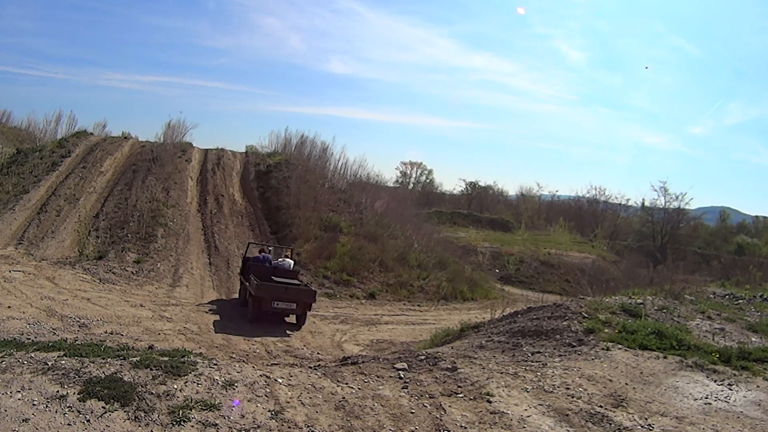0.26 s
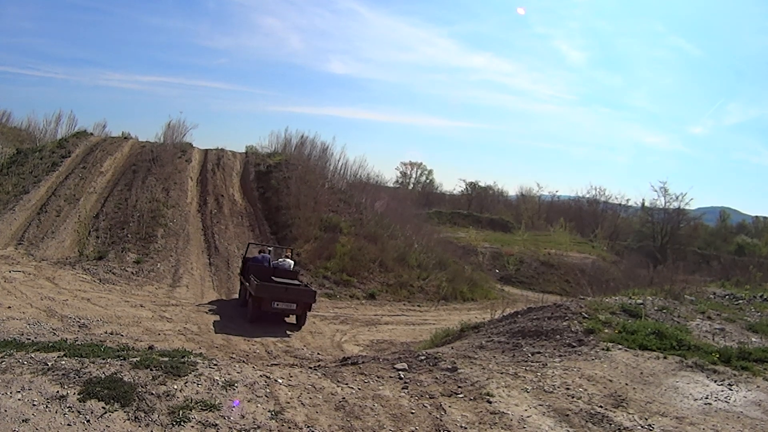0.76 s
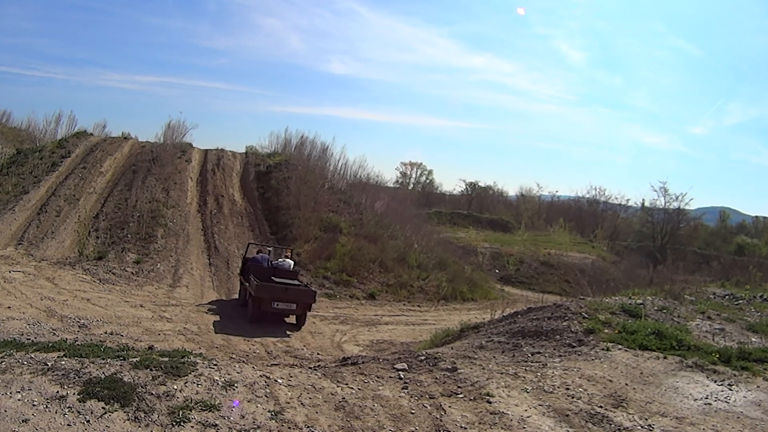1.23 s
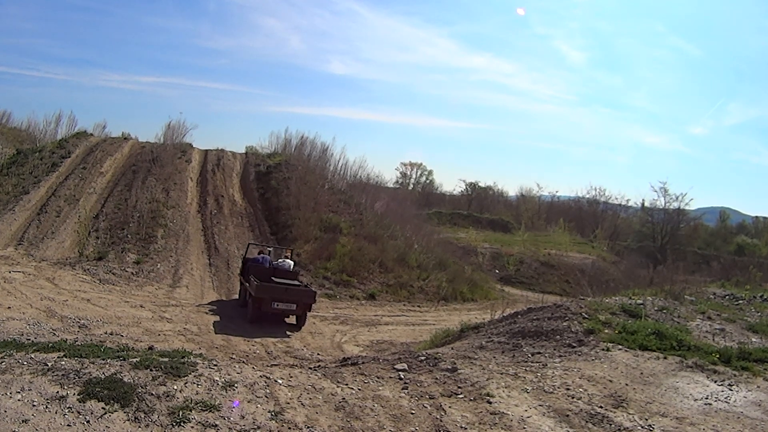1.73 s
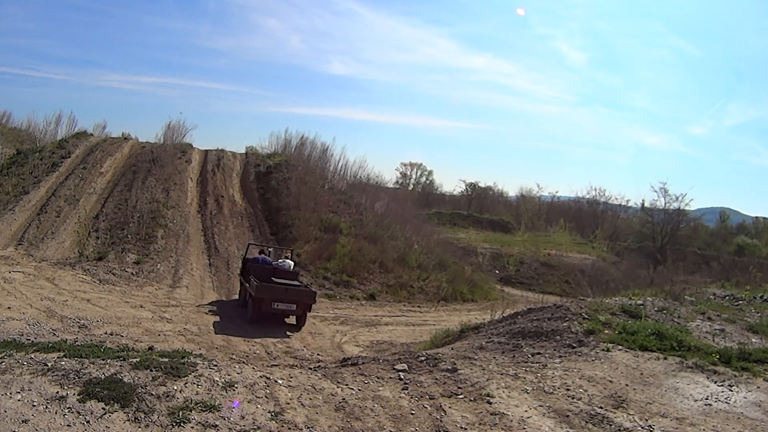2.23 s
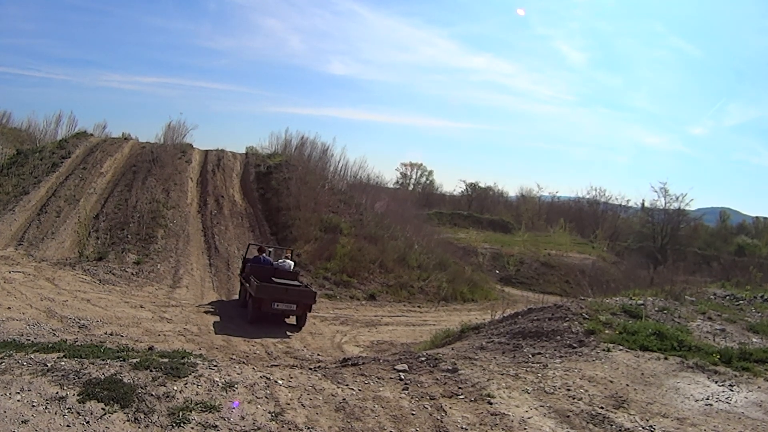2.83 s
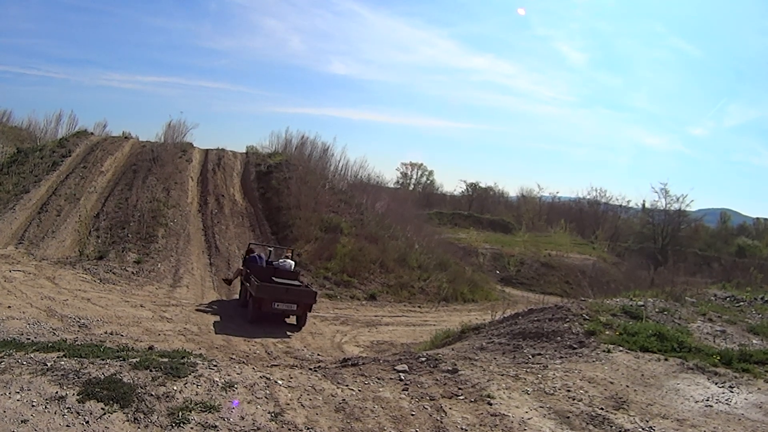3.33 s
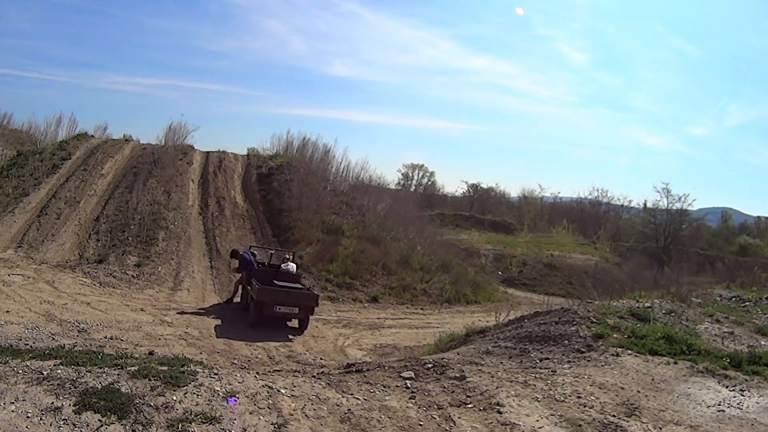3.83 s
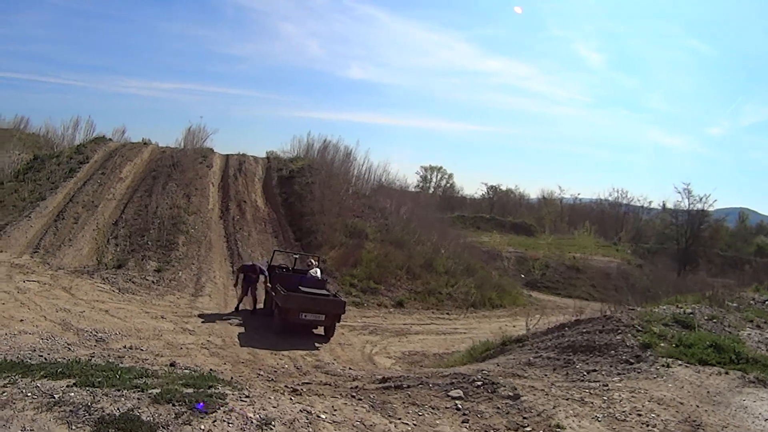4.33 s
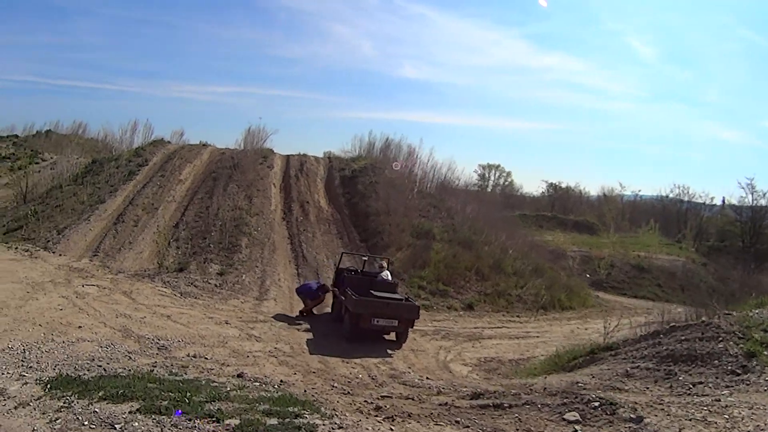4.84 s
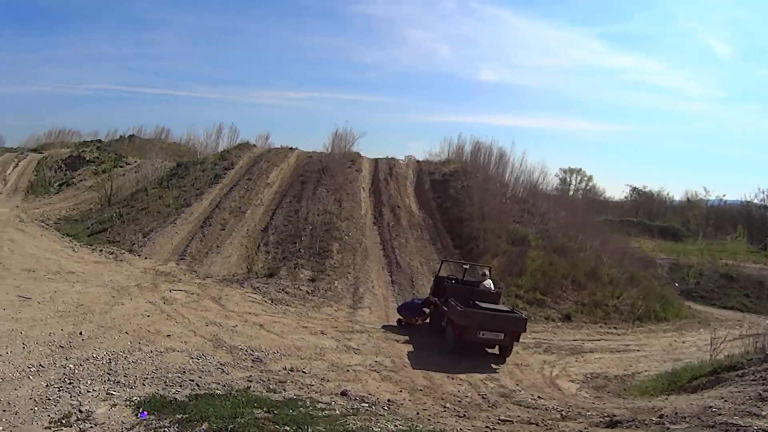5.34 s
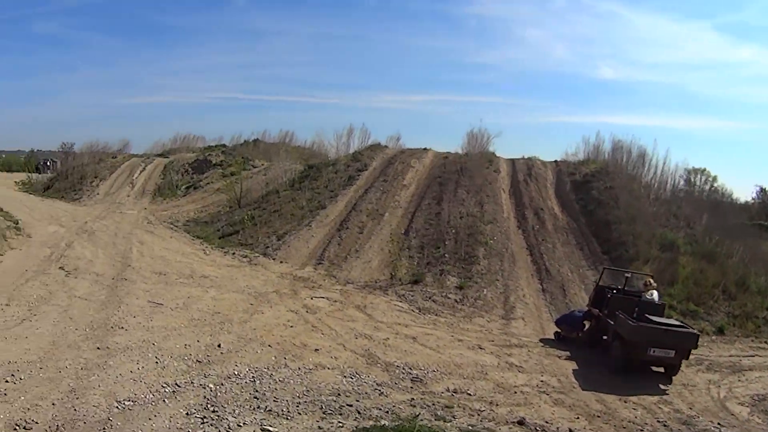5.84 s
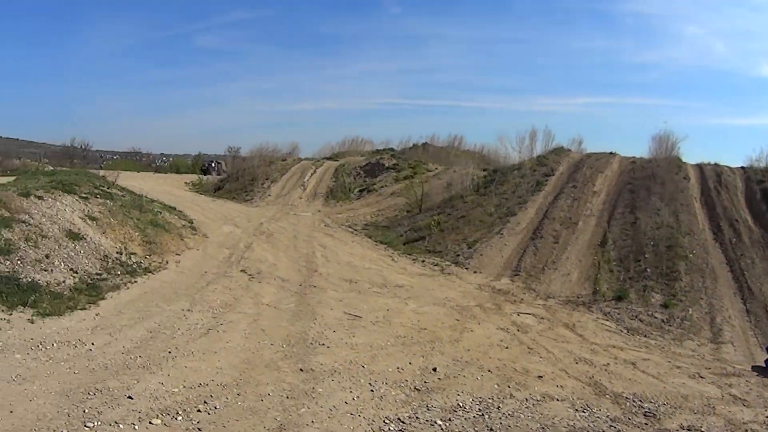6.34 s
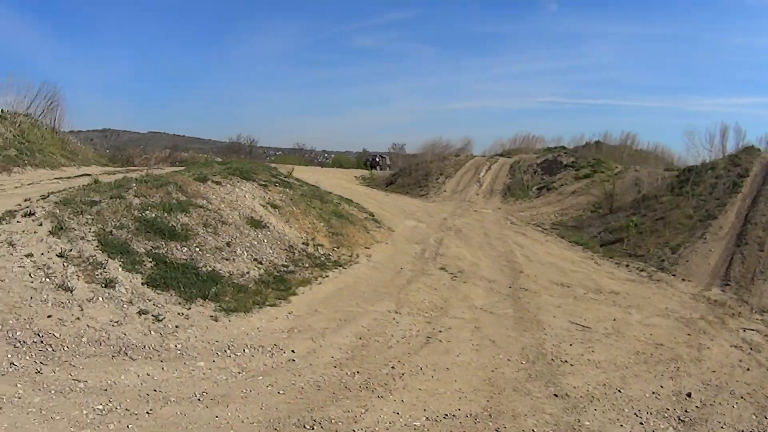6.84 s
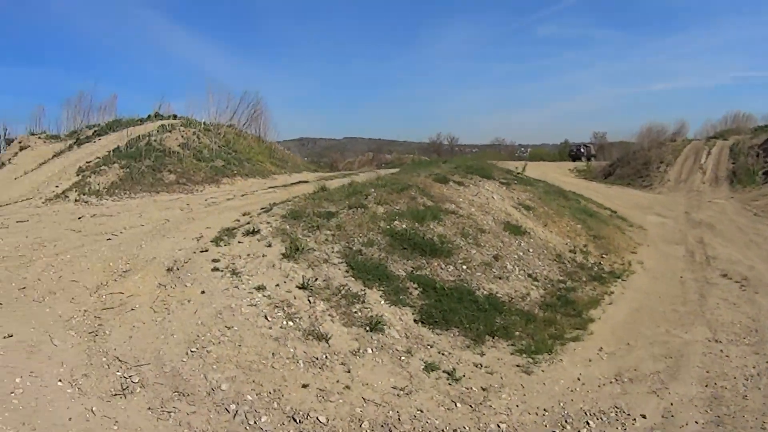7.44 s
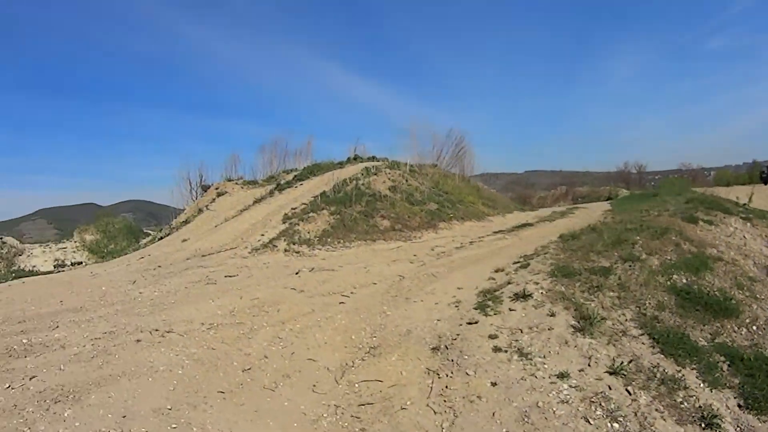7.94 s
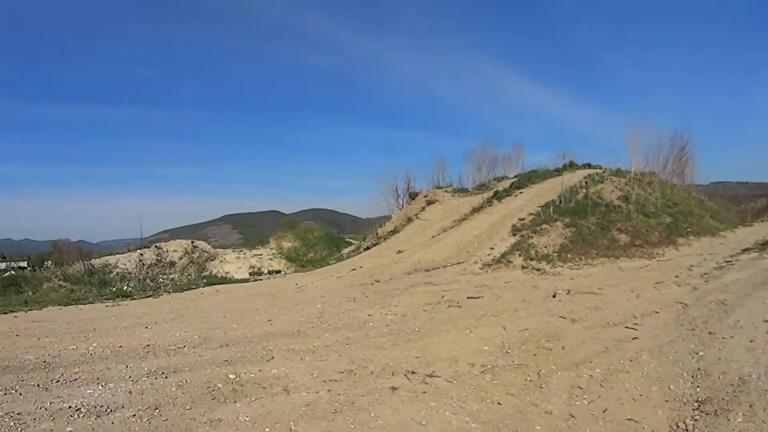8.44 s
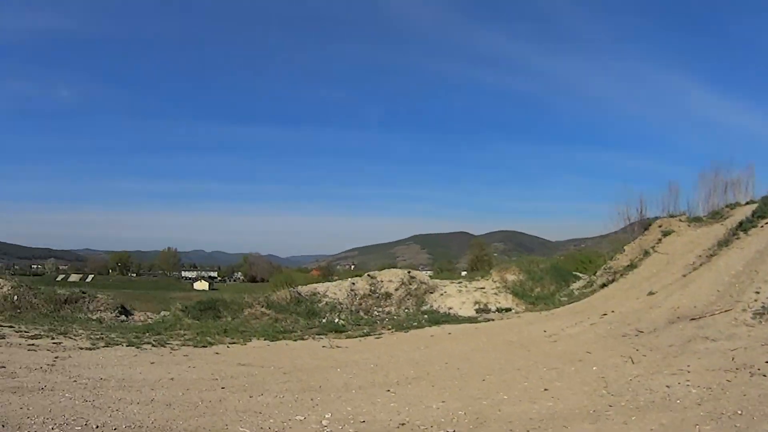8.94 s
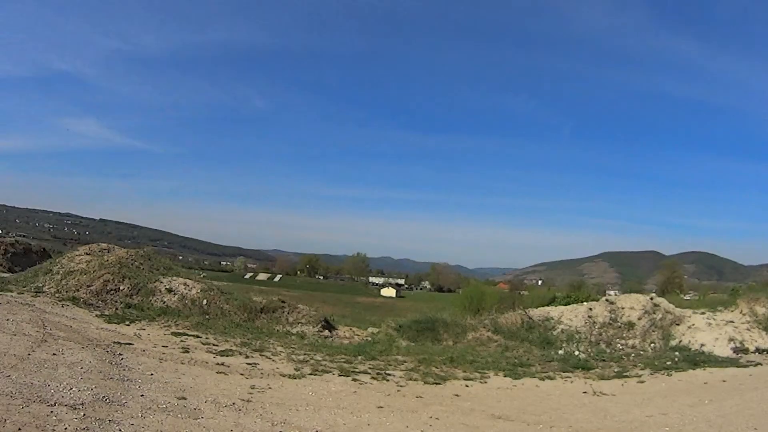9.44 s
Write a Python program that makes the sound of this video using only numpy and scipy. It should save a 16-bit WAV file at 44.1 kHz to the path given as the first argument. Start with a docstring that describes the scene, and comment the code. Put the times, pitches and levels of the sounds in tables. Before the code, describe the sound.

A small air-cooled engine idles, revs, then drives over bumpy dirt, heard on board with knocking bodywork and plastic clattering.

```python
"""A small air-cooled twin idles, is blipped, then drives a small off-road vehicle over rough dirt.
Heard from on board, its firings boom in the body and shake loose panels, while the chassis rumbles
and the bodywork knocks over bumps. The microphone's plastic housing rings, chatters and clacks in its
mount. Cooling air and tyres hiss on top, and gusts buffet the housing once under way."""
import sys
import numpy as np
from scipy import signal
from scipy.fft import rfft, irfft
from scipy.io import wavfile
from scipy.ndimage import uniform_filter1d

SR = 44100
rng = np.random.default_rng(int(sys.argv[2]) if len(sys.argv) > 2 else 0)


def persist_wave(psi):
    """Save psi, clipped to +-1, as 16-bit WAV."""
    counts = np.round(np.clip(psi, -1, 1) * 32767).astype(np.int16)
    wavfile.write(sys.argv[1], SR, np.atleast_2d(counts).T)


N = 426888
TIME = np.arange(N) / SR


def undb(db):
    """Decibels to gain."""
    return 10 ** (np.asarray(db) / 20)


def unit(x):
    """Scale to rms 1."""
    return x / np.sqrt(np.mean(x ** 2))


def peak(x, db):
    """Scale a short sound to a peak level."""
    return x * undb(db) / np.abs(x).max()


def curve(table):
    """Join rows of (seconds, value) by straight lines."""
    return np.interp(TIME, *np.transpose(table))


def noise():
    """White noise."""
    return rng.standard_normal(N)


def walk(rate):
    """Random levels held 1 / rate s and slewed; spread near 1."""
    size = int(SR / rate)
    steps = np.repeat(rng.standard_normal(N // size + 1), size)[:N]
    return 1.2 * uniform_filter1d(steps, size)


def waver(x, share, rate):
    """Let a sound's pitch wander by a small share, turning about rate times a second."""
    at = np.arange(N)
    return np.interp(at + share * SR / rate * walk(rate), at, x)


def colour(x, points):
    """Shape x by a spectrum of (Hz, dB) points."""
    hz, db = np.transpose(points)
    gain_db = np.interp(np.log(np.fft.rfftfreq(N, 1 / SR) + 1), np.log(hz), db)
    return irfft(rfft(x) * undb(gain_db), N)


def lowpass(x, hz, order):
    """Roll off the treble above hz."""
    return signal.sosfilt(signal.butter(order, hz, fs=SR, output="sos"), x)


def band(x, hz, width_hz):
    """A resonance applied twice, for steep skirts."""
    b, a = signal.iirpeak(hz, hz / width_hz, fs=SR)
    return signal.lfilter(b, a, signal.lfilter(b, a, x))


def ring(x, modes):
    """Drive a set of (Hz, width in Hz, dB) resonances, alternating in polarity."""
    return sum((-1) ** k * undb(db) * band(x, hz, width) for k, (hz, width, db) in enumerate(modes))


def add(track, s, sound):
    """Mix a short sound into the track at time s."""
    start = int(s * SR)
    track[start:start + len(sound)] += sound[:N - start]


def burst(decay_s, rise_s=0.00023):
    """A crowd of tiny contacts that dies away."""
    t = TIME[:SR // 4]
    return rng.standard_normal(len(t)) * (1 - np.exp(-t / rise_s)) * np.exp(-t / decay_s)


def pulses(cycles, scatter_db, weak_db):
    """One pulse a cycle, scattered in level, every second one weaker."""
    at = np.flatnonzero(np.diff(np.floor(cycles)))
    size_db = scatter_db * rng.standard_normal(600)[:len(at)] + weak_db * (np.arange(len(at)) % 2)
    out = np.zeros(N)
    out[at] = undb(size_db)
    return out


# The revs. Each row: time in seconds, crank speed in Hz (one firing a turn).
REVS = [(0, 22.02), (.8, 21.42), (2.2, 21.59), (2.6, 22.58), (3.0, 22.84), (3.11, 27.2), (3.22, 31.65),
        (3.44, 37.5), (3.67, 32.91), (3.95, 24.84), (4.15, 22.9), (4.33, 29.3), (4.55, 30.06),
        (4.76, 32.53), (4.98, 24.81), (5.25, 29.21), (5.52, 32.94), (5.8, 39.86), (6.03, 42.4),
        (6.43, 38.6), (6.75, 33.85), (6.95, 29.5), (7.7, 32.14), (8.08, 24.32), (8.3, 28.5), (8.5, 31.46),
        (8.68, 33.03), (8.9, 32.78), (9.1, 31.12), (9.3, 32.42), (9.68, 38.07)]
def crank():
    """The crank runs slightly unevenly; gives its count of turns and its smooth speed in Hz."""
    hz = curve(REVS)
    return np.cumsum(hz * (1 + .008 * walk(14))) / SR, hz


def by_load(hz, at_idle, at_load):
    """Slide a setting as the crank speeds up from idle to full load."""
    return np.interp(hz, [20.9, 29.1], [at_idle, at_load])


# Idle, a blip, pulling away, easing off, a second pull. Each row: time in seconds, dB over idle.
EFFORT = [(0, -0.5), (.85, -1.5), (1.15, -0.2), (1.7, -1), (2.2, 2.5), (3.01, 1), (3.12, 9.5), (3.27, 10.5),
          (3.4, 5), (3.55, 2), (4.98, 0.5), (5.1, 8), (5.45, 6.5), (5.7, 5.5), (6.9, 2.5), (8.0, 3),
          (8.12, 8.5), (8.55, 10), (8.76, 7.5), (8.92, 10.5), (9.3, 8), (9.68, 6.5)]
# How hard the vehicle shakes on its wheels. Each row: time in seconds, dB over standing still.
RIDE = [(0, 3), (2.98, 0), (3.06, 3.5), (3.3, 2.5), (3.5, -1), (4.95, 2), (5.04, 6), (5.16, 5), (5.9, 6.5),
        (6.6, 6.5), (7.72, 9.5), (7.87, 5), (8.25, 7), (8.95, 2), (9.68, 10)]
def shaking():
    """Drive levels in dB: effort raises boom, panels and housing; rough ground adds to the last two."""
    effort_db, ride_db = curve(EFFORT), curve(RIDE)
    boom_db = -26.5 + effort_db
    panel_db = -42.5 + 0.76 * effort_db + ride_db
    housing_db = -49 + 0.36 * effort_db + 0.31 * ride_db
    return boom_db, panel_db, housing_db


# The boom of the air in the body. Each row: pitch in Hz, width in Hz, gain in dB.
BOOM_MODES = [(46.3, 6.6, -13), (56.7, 13.5, 0), (96.4, 23.2, 1), (124.2, 30.5, 0)]
# The shell's higher, rougher ring. Each row: pitch in Hz, width in Hz, gain in dB.
SHELL_MODES = [(112.4, 36.6, 9.5), (156.8, 41, -2.5), (202.8, 45, 4), (262.7, 45, -3), (308.4, 46.5, -1),
               (385.8, 27.3, -11)]
def engine(turns, hz, boom_db):
    """Two unequal cylinders boom in the body; the shell chugs at idle and shakes roughly under load."""
    firings = unit(pulses(turns, scatter_db=1.5, weak_db=-2.5) / np.sqrt(hz))
    boom = unit(ring(firings + by_load(hz, 0.72, 0.75) * noise(), BOOM_MODES))
    rough = by_load(hz, 1.0, 2.67)
    shell = unit(ring((firings + rough * noise()) / np.hypot(1, rough), SHELL_MODES))
    shell_db = -5.5 + 0.15 * (hz - hz.min())
    return (boom * undb(-3.0) + shell * undb(shell_db)) * undb(boom_db)


# Clean tones under the boom. Each row: multiple of the crank speed, gain in dB.
HUM_PARTIALS = [(2, -2.5), (3, -14.5), (4, -8.5), (6, -7)]
def hum(turns, hz, boom_db, pull_db=3.5, cruise_db=-7.0, pull_hz_per_s=9.2):
    """Crank harmonics hum through the body: clear while the revs climb, faint at a cruise."""
    tones = sum(undb(db + 2.0 * walk(7.5)) * np.sin(2 * np.pi * multiple * turns)
                for multiple, db in HUM_PARTIALS)
    pull = uniform_filter1d(np.clip(np.gradient(hz) * SR / pull_hz_per_s, 0, 1), SR // 8)
    return ring(tones, BOOM_MODES) * undb(boom_db + 1.0 + pull_db * pull + by_load(hz, 0, cruise_db))


# The ring of the loose panels. Each row: pitch in Hz, width in Hz, gain in dB.
PANEL_MODES = [(372.3, 32, 0.5), (477.3, 99, 3), (555.5, 25.7, 5), (643.7, 104, 4.5), (851, 92, -2.5),
               (947, 87, -5.5)]
# The ring of the plastic housing. Each row: pitch in Hz, width in Hz, gain in dB.
HOUSING_MODES = [(1335, 540, -6), (1593, 125, 8), (1748, 297, 0.5), (2050, 2000, -20.5), (2970, 940, -14.5)]
def clatter(turns, hz, panel_db, housing_db, fade_turns=0.91, grain_db=-0.5):
    """Loose metal rings panels and housing: an even chatter at idle, a shake per firing under load."""
    load = np.clip((hz - 21) / 10, .15, 1)
    kick = np.exp(-(turns % 1) / fade_turns)
    shake = (1 - .55 * load + 1.5 * load * kick) * undb(1.3 * walk(30))
    on_panels, on_housing = (noise() * undb(grain_db * load * walk(400)) * shake for _ in range(2))
    panels = unit(waver(ring(on_panels, PANEL_MODES), share=0.02478, rate=5.0))
    housing = unit(ring(on_housing, HOUSING_MODES))
    return panels * undb(panel_db + 0.5) + housing * undb(housing_db + 3.0)


def scuffs(panel_db, per_s=24, scatter_db=2.5, decay_s=0.016, loose_db=-34):
    """Small random jolts scuff bodywork and housing, faintly until the panels shake hard."""
    when, strength = rng.random((round(per_s * N / SR), 2)).T
    jolts = np.zeros(N)
    jolts[(when * N).astype(int)] = undb(scatter_db * np.minimum(-np.log(1 - strength), 3))
    force = signal.lfilter([1], [1, -np.exp(-1 / (decay_s * SR))], jolts)
    modes = [(441, 155, 8.0), (1060, 1530, -3.0), (1670, 520, 3.0), (2770, 490, -13.0)]
    level_db = panel_db - 10.5 + np.minimum(panel_db - loose_db, 0)
    return unit(ring(force * noise(), modes)) * undb(level_db)


# The frame's deep sway. Each row: time in seconds, level in dB.
SWAY_LEVEL = [(0, -41), (2.3, -48), (2.9, -39), (3.2, -33), (3.55, -28), (4.1, -29), (4.5, -38),
              (4.9, -33.5), (5.45, -26.5), (5.9, -24.5), (6.2, -28), (6.55, -25.5), (6.9, -22.5),
              (7.15, -24.5), (7.65, -27), (8.0, -32.5), (8.3, -16.5), (8.65, -29.5), (8.95, -35),
              (9.3, -23.5), (9.68, -21)]
def chassis(turns, ground=0.78, tremble_db=-45):
    """The frame's lowest mode, rocked once a turn by the crank, jostled by the ground, never still."""
    rocking = band(np.sin(2 * np.pi * turns), hz=31.8, width_hz=22)
    jostle = unit(band(noise(), hz=32.2, width_hz=12.6))
    sway = unit(rocking + ground * jostle) * undb(curve(SWAY_LEVEL) - 0.5)
    return sway + jostle * undb(tremble_db)


def scrape(end_s=0.42, fade_s=0.055):
    """A brief, surging rasp of rubbing metal at the start."""
    rise = np.minimum(0.52 + TIME / 0.42, 1)
    fall = 1 / (1 + np.exp(np.minimum((TIME - end_s) / fade_s, 50)))
    modes = [(1630, 186, 11.0), (2070, 360, -6.5), (2320, 50, -1.5),
             (3100, 560, -5.5), (3750, 300, -17), (5270, 480, -15.5)]
    return undb(-36.5 + 2.4 * walk(12.7)) * rise * fall * unit(ring(noise(), modes))


# The firings sink as the vehicle coasts, then swell back. Each row: time in seconds, gain in dB.
COASTING_GAIN = [(6.2, 1.5), (6.7, -3), (7.5, -0.5), (7.75, 5), (8.1, 0)]
def frame(turns, hz, lurch_db):
    """The frame carries engine, loose metal and sway; boom and panels swell together as it lurches."""
    boom_db, panel_db, housing_db = shaking()
    coast_db = curve(COASTING_GAIN)
    motor = engine(turns, hz, boom_db) + hum(turns, hz, boom_db + coast_db)
    loose = clatter(turns, hz, panel_db + lurch_db / 2, housing_db) + scuffs(panel_db)
    return motor * undb(lurch_db + coast_db) + loose + chassis(turns) + scrape()


def drone(pitch_hz=60.0):
    """A steady low drone beats against the idle and sinks away as the engine revs."""
    level_db = np.interp(TIME, [0, 2.8, 4], [-34, -33, -46])
    return np.sin(2 * np.pi * pitch_hz * TIME) * undb(level_db)


def tappet(rate_hz=8.1, pitch_hz=6030, pip_s=0.016, level_db=-71.0, gone_s=7.1):
    """A faint, uneven metallic pip at idle that fades once under way."""
    strikes = pulses(TIME * rate_hz + .22 * walk(5), scatter_db=3.2, weak_db=-1)
    swell = signal.fftconvolve(strikes, np.hanning(int(pip_s * SR)), "same")
    pips = swell * np.sin(2 * np.pi * np.cumsum(pitch_hz + 30 * walk(54)) / SR)
    return unit(pips) * undb(level_db) * np.clip((gone_s - TIME) / 2, 0, 1)


# The tone of the air and tyre hiss. Each row: frequency in Hz, gain in dB.
HISS_EQ = [(1290, -34), (2200, 8), (2400, 0.5), (2600, -0.5), (2800, 10), (3690, 2), (5210, -17),
           (6040, -4), (6590, -9.5), (7490, -19), (8230, -17.5), (10500, -10.5), (11000, -60), (14300, -76),
           (22000, -120)]
# The fader for hiss and swish. Each row: time in seconds, level in dB.
HISS_LEVEL = [(0, -50), (.5, -54), (4.4, -55), (6.9, -57), (7.7, -49.5), (8.2, -51.5), (8.85, -55.5),
              (9.55, -47)]
# Narrow bands of treble swish. Each row: centre in Hz, width in Hz, gain in dB.
SWISH_BANDS = [(4620, 630, -7), (5180, 750, -3), (5760, 590, -9.5), (7400, 1400, -13)]
# The faint sheen on top. Each row: time in seconds, level in dB.
SHEEN_LEVEL = [(4.5, -63.5), (6.5, -62.5), (7.6, -63.5), (8.8, -71), (9.6, -64)]
def air():
    """Cooling air and tyres hiss; faint narrow treble bands swish and slide through the hiss."""
    hiss_db = curve(HISS_LEVEL)
    hiss = unit(colour(noise(), HISS_EQ)) * undb(hiss_db - 1.5 + 1.35 * walk(8.6))
    swish_db = np.interp(TIME, [4, 6, 7.7, 8.5, 9.6], [-6.0, -1, -3, -5.0, -7])
    swish = sum(unit(band(noise(), hz, width)) * undb(db + 0.6 * walk(3.2))
                for hz, width, db in SWISH_BANDS)
    slides = sliding_bands()
    sheen = unit(band(noise(), hz=7900, width_hz=7000)) * undb(curve(SHEEN_LEVEL))
    return hiss + swish * undb(hiss_db + swish_db) + slides + sheen


# The buffeting builds once under way. Each row: time in seconds, level in dB.
BUFFET_LEVEL = [(0, -43), (4.95, -44), (5.3, -32.5), (6.2, -24.5), (7.2, -26), (8.0, -32.5), (8.4, -27),
                (9.2, -31), (9.6, -20.5)]
# The low resonances it stirs. Each row: pitch in Hz, width in Hz, gain in dB.
BUFFET_MODES = [(74, 31, -2), (110.2, 52, 0.5), (218, 110, -5), (390, 135, -19)]
def buffeting(gust_db=1.8, gust_hz=14.0, apart=0.61):
    """Moving air and rough ground buffet the housing in uneven gusts, partly on each port alone."""
    gusts = [noise() * undb(gust_db * walk(gust_hz)) for _ in range(3)]
    shared, left, right = (unit(ring(gust, BUFFET_MODES)) for gust in gusts)
    return (shared + apart * np.array([left, right])) * undb(curve(BUFFET_LEVEL) + 0.5)


# Springs and body creak. Each row: start in seconds, pitch in Hz, peak in dB, length in seconds.
CREAKS = [(1.12, 1170, -40, 0.23), (5.328, 900, -28.5, 0.086), (5.47, 1850, -33, 0.067),
          (5.661, 1813, -33, 0.081)]
def creaks(width_hz=120.0):
    """Rubbing joints sing for a moment, each on a rough note that swells and dies."""
    out = np.zeros(N)
    for s, hz, db, length_s in CREAKS:
        size = int(length_s * SR)
        rub = np.hanning(size) * noise()[:size]
        add(out, s, peak(band(rub, hz, width_hz), db))
    return out


# Bodywork hits. Each row: start in seconds, ring peak in dB, hardness from 0 to 1, decay in seconds.
BODYWORK_KNOCKS = [(1.822, -16.5, 0.03, 0.033), (2.179, -29, 0, 0.038), (2.446, -27.5, 0.15, 0.015),
                   (2.508, -22, 1, 0.0072), (2.857, -20.5, 0.37, 0.031), (2.891, -19, 0.14, 0.0064),
                   (3.014, -29.5, 0.54, 0.017), (3.062, -25, 0.55, 0.13), (3.135, -17, 0.45, 0.092),
                   (4.059, -28, 0.54, 0.03), (4.265, -27.5, 0.67, 0.028), (4.325, -32, 0.68, .01),
                   (4.502, -24, 0.36, 0.0048), (4.78, -30, 0.71, 0.016), (5.162, -22.5, 0.66, 0.019),
                   (5.459, -29, 0.95, 0.012), (6.35, -21, 1, 0.011), (6.457, -17, 0.39, 0.029),
                   (6.574, -18.5, 0.68, 0.0081), (6.599, -16.5, 0.56, 0.024), (6.89, -18, 0.31, 0.02),
                   (6.959, -17.5, 0.35, 0.014), (7.124, -11, 0.74, 0.016), (7.144, -14.5, 1, 0.02),
                   (7.297, -18, .6, .012), (7.343, -7.5, 0.81, 0.01), (7.393, -22.5, 0.85, 0.015),
                   (7.503, -21, 0.6, 0.0037), (7.558, -12.5, 0.76, 0.012), (7.687, -16.5, 0.9, 0.02),
                   (7.916, -26.5, 1, 0.0055), (8.203, -14, 0.75, 0.011), (8.363, -15, 0.5, 0.0062),
                   (9.479, -12, 0.72, 0.013)]
# The ring of the bodywork. Each row: pitch in Hz, width in Hz, gain in dB.
KNOCK_MODES = [(477, 102, 1), (641.5, 100, 8), (785, 150, -7), (894, 144, 5), (1194, 350, -21)]
def knocks():
    """Bumps knock and ring the bodywork: soft blows thud low, hard ones clank in the housing."""
    out = np.zeros(N)
    for s, db, hardness, decay_s in BODYWORK_KNOCKS:
        blow = burst(decay_s)
        thud_db = np.interp(hardness, [0, 1], [2.5, -12.5])
        clank_db = np.interp(hardness, [0, 1], [-19.5, -3.5])
        tilt_db = 1.6 * (clank_db + 8.5)  # per octave: harder blows favour the upper modes
        modes = [(hz, width, gain + tilt_db * np.log2(hz / 700)) for hz, width, gain in KNOCK_MODES]
        bodywork = peak(ring(blow, modes), db)
        thud = peak(ring(blow, [(174, 75, -8), (300.7, 57, -1)]), db + thud_db)
        clank = peak(ring(blow, [(1437, 483, 2.1), (1680, 255, 5.9)]), db + clank_db)
        add(out, s, bodywork + thud + clank)
    return lowpass(out, 1800, order=6) + undb(14.5) * band(out, hz=2640, width_hz=700)


def chatter(turns, full_db=-40.0, loose_db=-43.5, steepness=4.7):
    """When the housing shakes hard, it taps in its mount twice a turn, each tap of a different force."""
    _, _, housing_db = shaking()
    taps = pulses(2 * turns + .15 * walk(40), scatter_db=2.8, weak_db=-4)
    modes = [(850, 810, -5.5), (1530, 350, -0.5), (2644, 190, -8.0), (4760, 540, -21.5)]
    dull = lowpass(ring(taps, modes), 5000, order=4)
    return unit(dull) * undb(full_db + steepness * np.minimum(housing_db - loose_db, 0))


# Plastic clacks. Each row: start in seconds, knock peak in dB, treble snap in dB against the knock.
MOUNT_CLACKS = [(3.313, -26.5, -14), (3.3344, -26, -9), (3.3473, -27.5, -9), (3.363, -29, -9),
                (3.375, -28, -10.5), (3.382, -26.5, -8), (3.406, -29.5, -8.5), (3.421, -32, -9),
                (3.633, -29, -11), (3.674, -32, -10), (3.703, -30.5, -9.5), (5.7318, -22.5, -7.5),
                (6.9594, -22.5, -11), (7.7007, -17, -6.5), (7.731, -19, -15), (7.749, -22.5, -20),
                (8.1217, -20.5, -14), (8.138, -29, -10), (8.181, -24, -11), (8.2258, -21, -12),
                (8.2643, -16.5, -11), (8.2834, -20, -12), (8.2972, -13.5, -17), (8.3342, -28, -7),
                (8.3576, -23, -11), (8.379, -24, -11), (8.395, -14, -17.5), (8.4575, -23, -11),
                (8.4872, -17, -15), (8.5188, -16, -12), (8.55, -27, -8.5), (8.616, -22.5, -8),
                (8.6515, -18.5, -12), (8.6793, -20, -13), (8.71, -13, -17.5), (8.743, -13.5, -20),
                (8.7744, -13.5, -23), (8.8035, -14.5, -19), (8.8385, -14.5, -27), (8.9024, -18.5, -18),
                (8.925, -24.5, -18), (8.9852, -19, -15), (9.1188, -11.5, -17), (9.1517, -20, -15),
                (9.18, -18, -15), (9.4335, -19.5, -14), (9.4646, -19.5, -23), (9.6287, -16.5, -30)]
def clacks(grit_s=0.0044, grit=0.24, detune=0.02, click_s=0.0004):
    """The mount hits its stop as the frame rocks: a gritty snap, a plastic knock and a hollow tail."""
    out = np.zeros(N)
    for s, db, treble_db in MOUNT_CLACKS:
        grains = grit * burst(grit_s)
        contact = signal.unit_impulse(len(grains))
        note = 1 + detune * np.clip(rng.standard_normal(), -2, 2)
        knock = peak(band(contact + 0.051 * grains, 1620 * note, width_hz=265), db)
        balance_db = 2.0 * np.clip(rng.standard_normal(), -2, 2)
        hollow_modes = [(640 * note, 150, balance_db), (860 * note, 200, -balance_db)]
        hollow = peak(ring(contact + 0.17 * grains, hollow_modes), db - 0.5)
        snap = peak(ring(contact + grains, [(2710, 630, 4.5), (4500, 5800, -8.5)]), db + treble_db)
        # only the hardest contacts click clearly; softer ones are also duller
        click_db = db + treble_db - 5.5 + 3 * min(treble_db + 8, 0)
        click = peak(band(burst(click_s), hz=4400, width_hz=5000), click_db)
        cutoff_hz = np.interp(treble_db, [-10, 0], [4800, 7200])
        add(out, s, lowpass(knock + hollow + snap, cutoff_hz, order=4) + click)
    return out


def glide(length_s, first_hz, last_hz, width_hz):
    """A rough note that swells, slides in pitch and dies."""
    size = int(length_s * SR)
    flutter = unit(lowpass(noise(), width_hz / 2, order=2))[:size]
    phase = 2 * np.pi * np.cumsum(np.linspace(first_hz, last_hz, size)) / SR
    return np.hanning(size) * flutter * np.sqrt(2) * np.sin(phase)


# Treble slides. Each row: start and length in seconds, first and last pitch in Hz, level in dB.
SLIDES = [(5.302, 0.96, 4850, 5200, -65), (5.352, 0.85, 4450, 4500, -66), (5.847, .75, 6200, 5730, -63),
          (6.548, 1, 5250, 5020, -61), (6.953, .75, 4940, 4520, -61), (6.7, 1.19, 7002, 7850, -68),
          (7.296, 1.3, 5750, 5900, -64)]
def sliding_bands(width_hz=340.0):
    """Faint, narrow treble bands slide through the hiss."""
    out = np.zeros(N)
    for s, length_s, first_hz, last_hz, db in SLIDES:
        add(out, s, glide(length_s, first_hz, last_hz, width_hz) * undb(db))
    return out


def groan(start_s=6.6, level_db=-29.0):
    """A low groan sinks in pitch as the vehicle coasts over the bumps."""
    out = np.zeros(N)
    note = glide(length_s=1.0, first_hz=265.0, last_hz=189.3, width_hz=40.0)
    add(out, start_s, note * undb(level_db))
    return out


# Short buzzes near the end. Each row: start in seconds, peak in dB.
RATTLES = [(8.625, -16.5), (9.352, -14.5), (9.466, -16), (9.521, -20), (9.541, -15.5), (9.572, -12.5),
           (9.595, -15.5), (9.654, -13)]
def rattles(buzz_s=0.003):
    """A loose part buzzes briefly on its own note."""
    out = np.zeros(N)
    for s, db in RATTLES:
        add(out, s, peak(ring(burst(buzz_s), [(860, 100, 7.5), (700, 150, -6.0)]), db))
    return out


# Stereo width from the flexing housing. Each row: frequency in Hz, side gain in dB.
FLEX_EQ = [(60, -10), (115, -12.5), (190, -1), (340, 3), (600, 8.5), (900, -1), (1150, 5), (1650, -13.5),
           (2300, 6), (3200, 4.5), (5500, 1), (10700, -23)]
def two_ports(along, across, direct=0.64, diffuse=0.66):
    """The housing flexes a quarter cycle out of step with its shaking; sideways shaking adds flex."""
    side = colour(signal.hilbert(direct * along + diffuse * across).imag, FLEX_EQ)
    side += ring(along, [(1100, 700, -20), (330, 470, -6.0)])  # two modes favour one port each
    return np.array([along + side, along - side])


def scene():
    """The frame shakes the microphone along and across; the hiss comes through the air."""
    turns, hz = crank()
    lurch_db = 1.5 * walk(9) * by_load(hz, .3, 1)
    along = frame(turns, hz, lurch_db) + knocks() + rattles() + creaks() + clacks()
    along += chatter(turns) + drone() + tappet() + groan()
    across = frame(turns + 1 / 4, hz, lurch_db) + undb(-10.0) * knocks()
    shaken = two_ports(along, across) + buffeting()
    air_mid, air_side = air(), undb(-3.0) * air()
    return shaken + np.array([air_mid + air_side, air_mid - air_side])


def record(dry, bass_hz=12, ceiling=.95, top_hz=11100):
    """Cut the deepest bass, round the highest peaks and cut the top."""
    trimmed = signal.sosfilt(signal.butter(2, bass_hz, "high", fs=SR, output="sos"), dry)
    rounded = trimmed / (1 + (trimmed / ceiling) ** 8) ** (1 / 8)
    return signal.sosfilt(signal.ellip(10, .2, 80, top_hz, fs=SR, output="sos"), rounded)


dry = scene()
out = record(dry)
persist_wave(out)
```